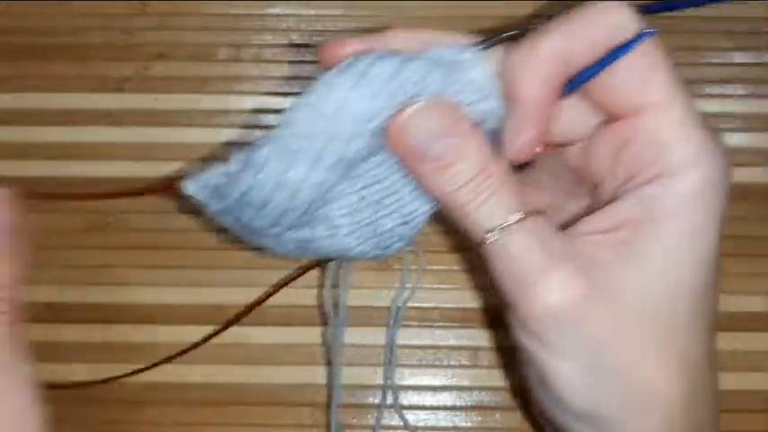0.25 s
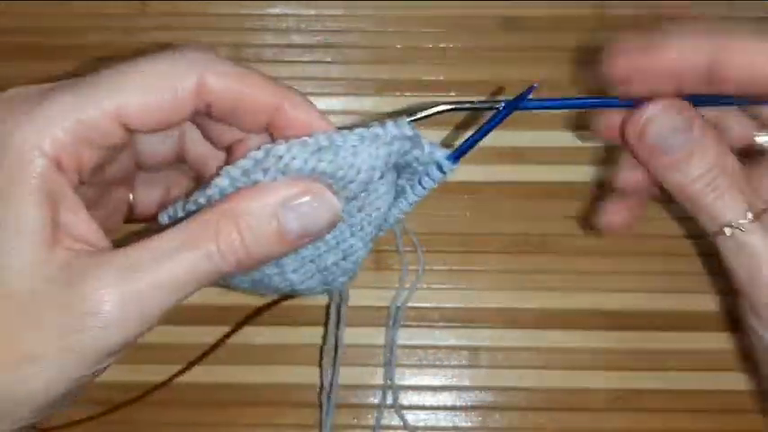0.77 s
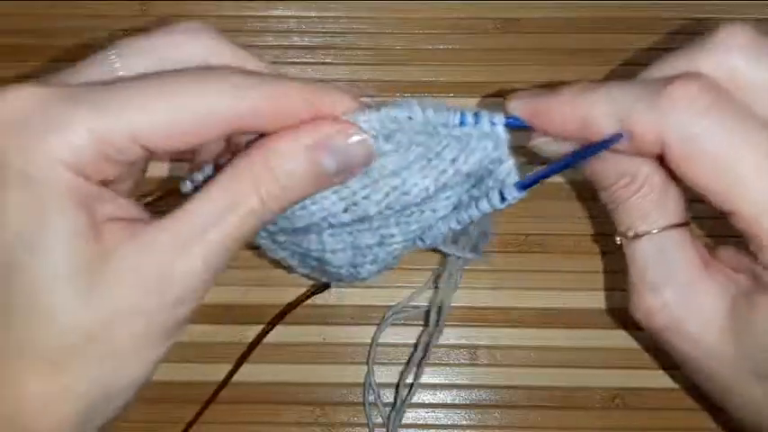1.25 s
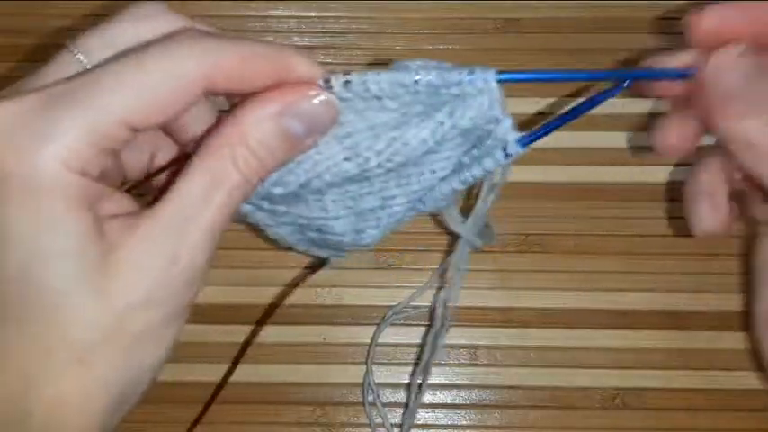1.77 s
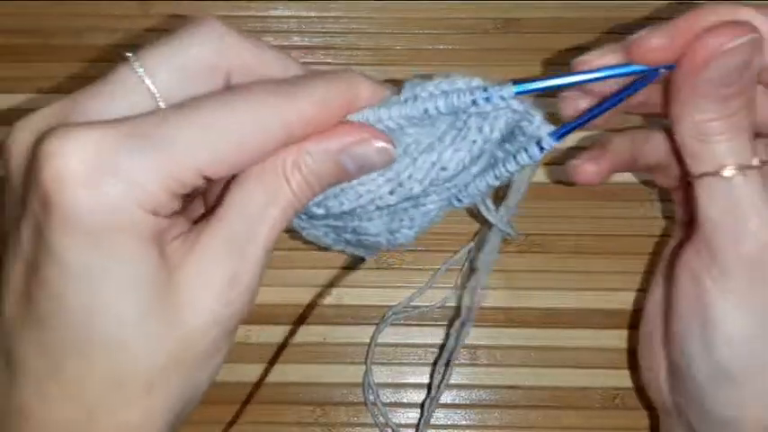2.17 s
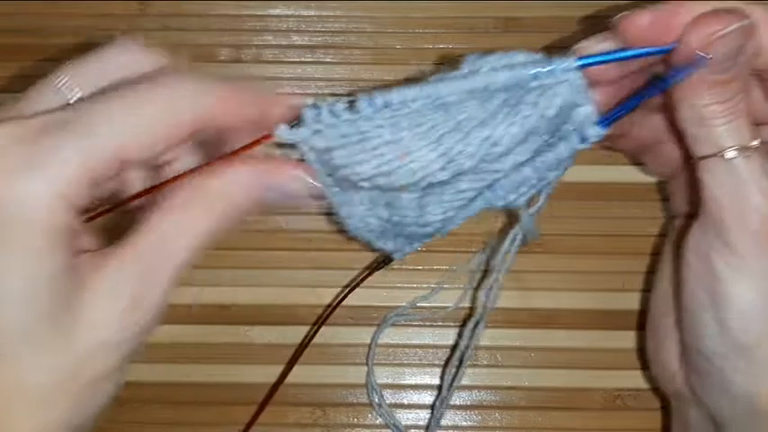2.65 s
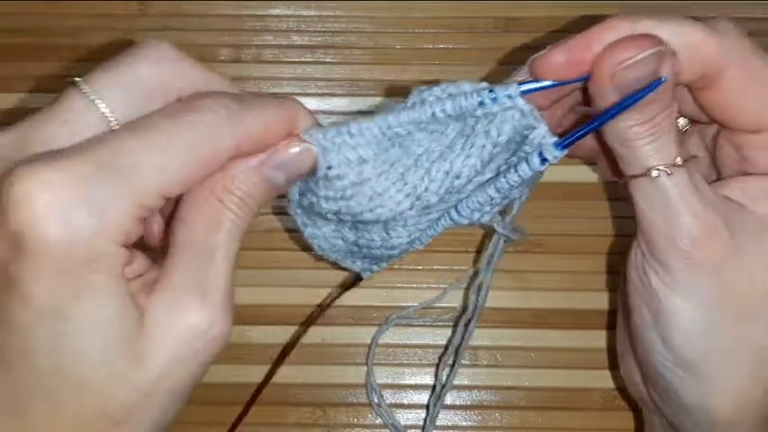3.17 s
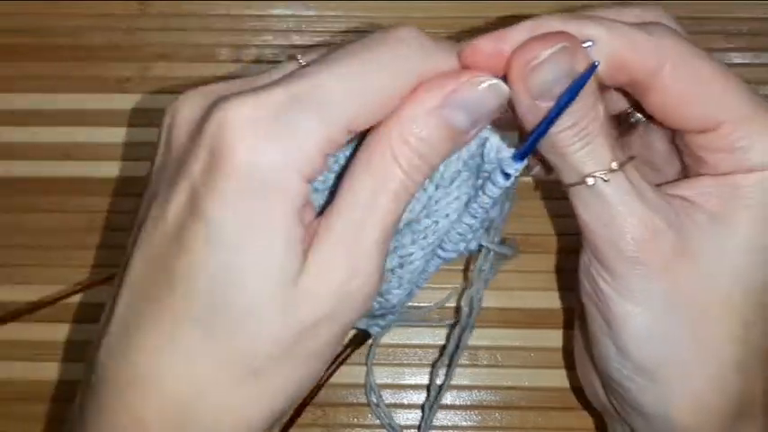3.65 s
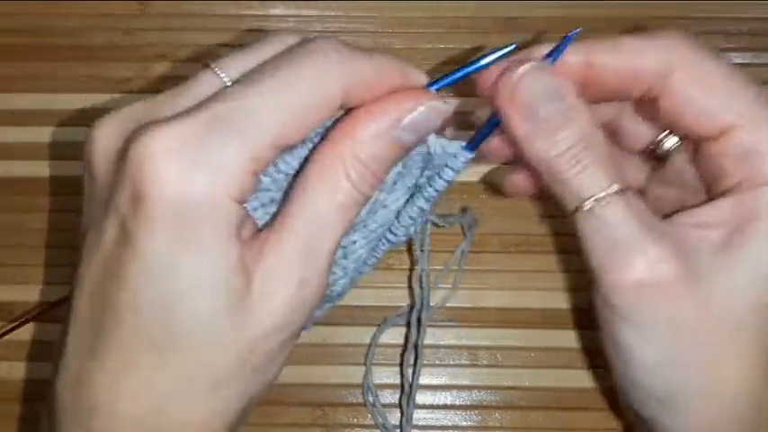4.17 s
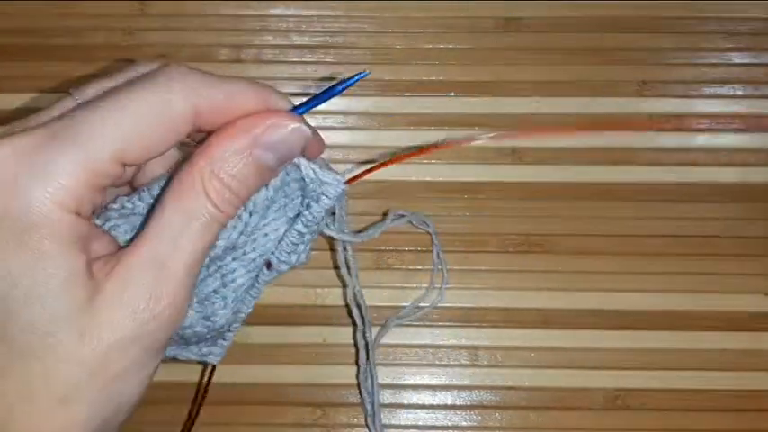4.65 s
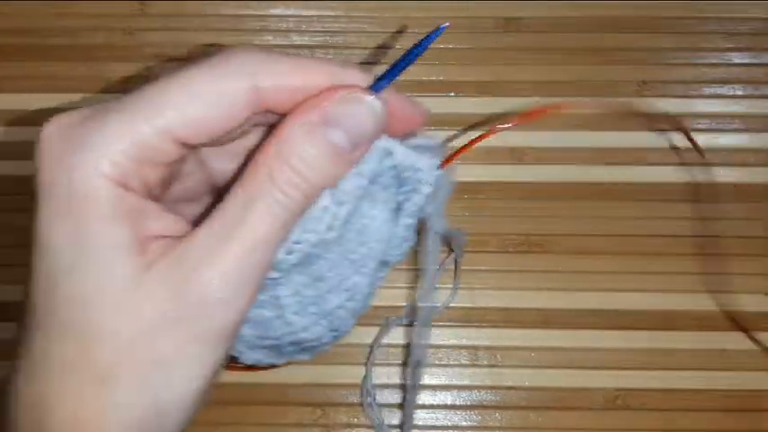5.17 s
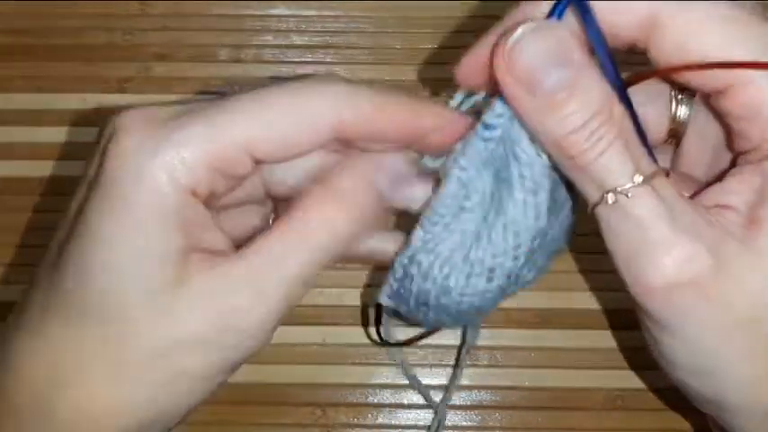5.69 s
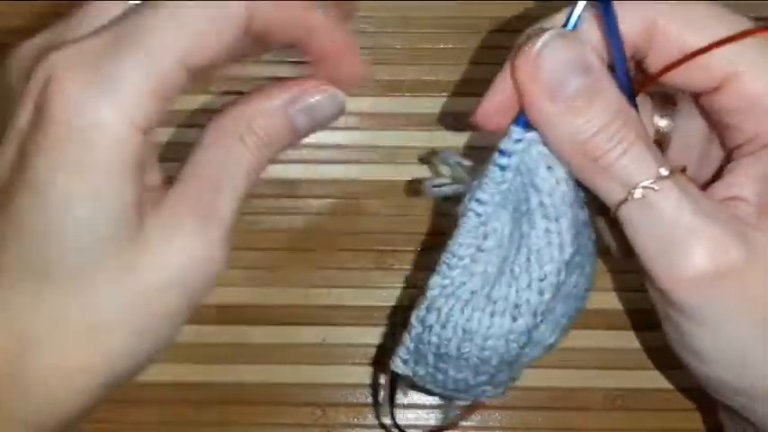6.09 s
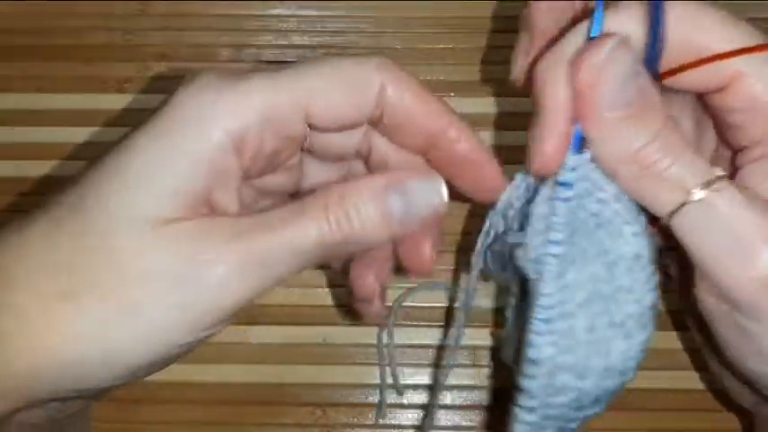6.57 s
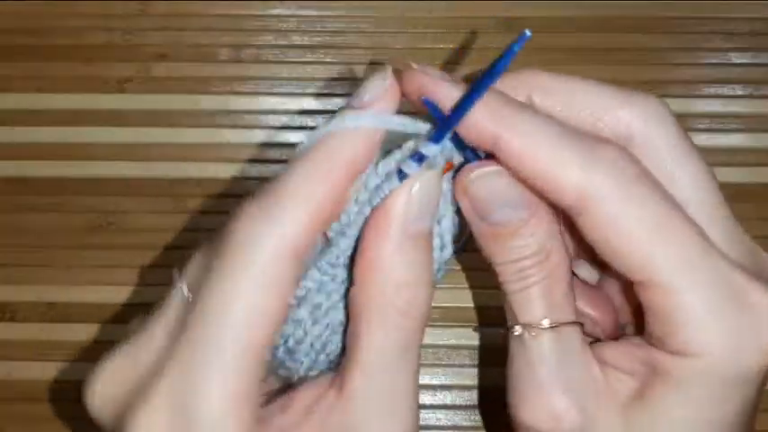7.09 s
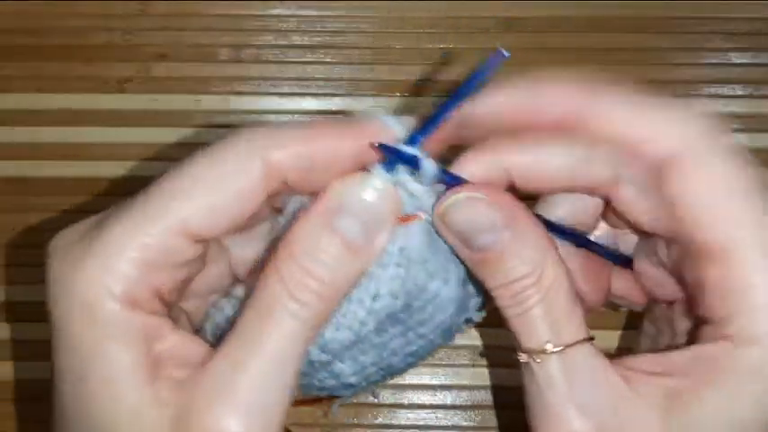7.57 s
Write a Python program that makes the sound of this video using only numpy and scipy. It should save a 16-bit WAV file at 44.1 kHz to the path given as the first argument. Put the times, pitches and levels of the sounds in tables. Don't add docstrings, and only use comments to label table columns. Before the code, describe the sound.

A small, hard-walled indoor space, very close stereo pickup, with a steady low hum and faint hiss. At 0.0 s a bright, sharp needle click, leaning left, then small metallic ticks and taps between 0.1 and 0.8 s, a cluster with a thin ring near 0.5. Soft wool rubs swell around 0.3, 0.9, 1.25 and 1.65, the stitches whistling faintly. A clear tick at 2.1 follows a short slide; a dull tap at 2.6. Brief rustles at 3.2-3.5, then airy yarn hiss from 4.1 to 4.7. At 5.13 a loud, abrupt cable slap on the slats, with clatter, a low thud and short ring. Near-quiet returns with faint slides. At 6.77-6.84 a rising clatter bursts into hard, fast raps that bounce away, echoing briefly. Tiny ticks at 7.2 and 7.6, and soft wool rubs near 7.5 and 7.7, finish it.

```python
import sys
import numpy as np
from scipy import signal
from scipy.fft import rfft, irfft
from scipy.io import wavfile
from scipy.ndimage import uniform_filter1d

SR = 44100
rng = np.random.default_rng(int(sys.argv[2]) if len(sys.argv) > 2 else 0)


def volts_from_db(level):
    exponent = np.asarray(level, float) / 20
    return 10 ** exponent


def transcribe(signal):
    frames = np.atleast_2d(signal).T
    limited = np.clip(frames, -1, 1)
    pcm = np.round(limited * 32767).astype(np.int16)
    wavfile.write(sys.argv[1], SR, pcm)


N = 345160

# frequency [Hz], density [dB per Hz].
FLOOR_COLOUR = [(15, -51.5), (25, -16.5), (102, -7), (134, 0.5), (166, -7.5), (229, -10.5), (309, -12.5),
                (384, -16), (476, -19), (2050, -24.5), (3250, -26), (8140, -28), (13600, -25),
                (16000, -105)]
# frequency [Hz], likeness [-1 to 1].
FLOOR_LIKENESS = [(60, -0.017), (150, 0.79), (380, 0.36), (950, -0.053), (2380, -0.021), (5980, 0.00048),
                  (15000, -0.015)]
# frequency [Hz], left over right [dB].
FLOOR_LEANING = [(60, 0), (180, -0.5), (550, -0.5), (1650, -1.0), (4970, -0.5), (15000, -1)]
FLOOR_DB = -57

# start [s], peak level [dB], centre frequency [Hz], left over right [dB], room feed [dB].
TIP_TICKS = [(0.0275, -5.5, 6140, 5, 0.5), (0.3022, -25, 6800, -1, 5), (0.307, -26, 6500, -4, -7),
             (0.4835, -22.5, 4700, -3, -4), (0.4867, -27.5, 7100, 7.5, 1), (0.4964, -32, 6770, 3, -1),
             (1.6124, -35, 8270, -8, 3), (1.6415, -33, 8250, -12, 2), (2.1208, -15.5, 7800, -1.5, 1),
             (5.6283, -38, 12500, -2, 4), (6.7747, -20, 4130, 4, 9), (7.209, -33, 7000, 0, 1),
             (7.5927, -38, 11500, 5, -3)]
# start [s], peak level [dB], centre frequency [Hz], left over right [dB], room feed [dB].
SHAFT_TAPS = [(0.075, -27, 5500, -0.5, 2), (0.0846, -31, 4170, -12, -1), (0.184, -37.5, 5200, -3, 8.5),
              (0.354, -39, 5100, 1, 5), (0.5162, -35, 4470, -3.5, 7), (0.5639, -28, 6300, 13, 8),
              (0.645, -30.5, 7600, 4, 6), (0.825, -40, 5700, 5, 9.5), (1.065, -40, 5840, 0, 7),
              (1.4196, -31, 5500, -6, 9), (2.5068, -40.5, 5560, 18, 10.5), (2.5882, -27.5, 5200, 1, 5.5),
              (3.4045, -34, 6540, -14, 3), (5.1287, -6.5, 5060, -9, 7.5), (6.335, -46, 6310, 6, -1),
              (7.225, -40, 6810, 7, -7.5)]
# start [s], peak level [dB], centre frequency [Hz], left over right [dB], room feed [dB].
CABLE_RAPS = [
    (0.3035, -34, 2700, 7, 6),
    (0.4838, -42, 1700, -8, -3),
    (2.133, -37.5, 3030, 11, 13),
    (2.3284, -42, 2680, 6, 4.5),
    (3.405, -37, 2400, -5, 9),
    (6.792, -7.5, 5000, -5.5, 1.5),
    (6.8005, -9, 4200, 3, -5),
    (6.8068, -12, 4380, 3, -13),
    (6.8125, -16, 5500, -13, -8),
    (6.835, -18, 4300, -16, -12),
]
# broad crack [dB], top needle mode [dB].
TIP_COLOUR = (9.1, -15.5)
SHAFT_COLOUR = (8, -19)
RAP_COLOUR = (-6, -25)
RATTLE_SHARE = 0.21
# start [s], peak level [dB], frequency [Hz], 60 dB decay time [s].
PINGS = [
    (0.483, -25.5, 11700, .015),
    (.488, -28, 11800, 0.031),
    (0.486, -34, 11370, .04),
    (.488, -33, 14400, .02),
    (5.13, -36, 5213, .3),
    (5.13, -37, 3410, .15),
    (5.132, -36, 5650, .1),
    (6.801, -30.5, 3800, 0.12),
    (6.8, -26, 4170, 0.085),
]

# start [s], peak level [dB], centre frequency [Hz], length [s], room feed [dB].
THUDS = [
    (0.286, -48.5, 97, 0.015, 4),
    (.483, -43.5, 660, 0.0011, 0),
    (1.567, -50, 800, 0.003, 0),
    (2.12, -51.5, 605, 0.0031, 3.5),
    (3.441, -50, 705, 0.0015, 0.5),
    (3.738, -50, 650, 0.009, -3),
    (5.127, -32, 372, 0.024, -6.5),
    (6.333, -54, 900, 0.0023, -10),
    (6.811, -50, 710, 0.039, 7.5),
]

# strongest moment [s], swell [s], fade [s], level [dB], mode frequency [Hz].
STITCH_SLIDES = [(1.27, .13, 0.084, -56.5, 4620), (1.24, 0.13, .1, -66, 8150),
                 (1.642, .06, 0.046, -57, 7900), (2.03, 0.12, 0.15, -60, 4900),
                 (2.09, 0.064, 0.046, -56, 4950), (3.43, 0.033, .06, -60.5, 2200),
                 (2.0, 0.084, .13, -64, 7900), (4.55, .15, 0.38, -64, 7600), (5.52, .15, 0.1, -66.5, 6000),
                 (5.85, .04, .04, -61, 6360), (5.845, .04, .04, -65, 5100), (6.9, .04, .08, -66, 6000),
                 (7.032, 0.056, .05, -65, 5900)]
# strongest moment [s], swell [s], fade [s], level [dB], mode frequency [Hz].
WOOL_RUBS = [(.33, 0.04, 0.071, -51.5, 4850), (.465, 0.1, .012, -58, 4850), (.91, 0.076, 0.13, -61.5, 5400),
             (1.04, 0.068, 0.071, -66, 5400), (1.645, 0.086, .12, -54, 5030),
             (3.224, .035, 0.072, -55.5, 5630), (3.412, 0.0077, 0.088, -57, 4000),
             (3.46, .06, 0.071, -55.5, 5500), (2.1, .2, 0.033, -55.5, 5470),
             (1.25, 0.15, 0.11, -53.5, 5500), (3.75, 0.096, 0.36, -65.5, 5430),
             (4.22, .14, 0.13, -55, 6500), (4.25, 0.14, .12, -58, 12200), (4.36, .12, .1, -57, 13500),
             (4.444, 0.12, 0.081, -55, 5630), (4.6, 0.064, .08, -58, 14000), (4.68, 0.15, 0.18, -63, 12000),
             (7.48, .13, 0.074, -58.5, 5630), (7.735, .1, 0.055, -53, 5600)]
# first mode width [Hz], middle mode [dB], top mode [dB], hiss [dB], flatness of the peak [exponent].
STITCH_COLOUR = (850, -10, -5, -3.5, 3.2)
RUB_COLOUR = (4200, -16, -4, -14, 1.5)
# frequency [Hz], width [Hz].
UPPER_MODES = [(8150, 1500), (12000, 5000)]
STROKE_DEPTH_DB = 17
STUTTER_DB, STUTTER_S = 2, 0.0073

# start [s], rise [s], hold [s], level [dB], fade [dB per s].
FALLS = [
    (5.1283, .001, 0.011, -23.5, 700),
    (6.771, .021, 0.028, -29.5, 750),
]
# frequency [Hz], density [dB per Hz].
FIRST_FALL = [(88, -50), (150, -26), (352, -15), (1090, -14), (2020, -15.5), (3350, -6), (4140, -9.5),
              (5540, -1.5), (9360, -9), (11400, -3.5), (15500, -35)]
SECOND_FALL = [(180, -58.5), (300, -18), (794, -23), (1180, -27), (1670, -10), (2980, -6.5), (4070, -4),
               (5050, -8), (6360, -8), (9290, -11), (15500, -17)]
FALL_RISE_DB = 15

# frequency [Hz], 60 dB decay time [s].
ROOM_T60 = [(300, 0.13), (900, 0.31), (2000, 0.26), (5500, .28), (14000, 0.28)]
FIRST_ECHO_S, BUILD_UP_S, ECHO_LUMPS_DB = 0.0031, 0.002, -3.5

# frequency [Hz], width [Hz], gain [dB].
LEFT_PORT = [(5800, 6200, 6), (8620, 6000, -27), (12150, 2500, -3), (17100, 4700, -4)]
RIGHT_PORT = [(3800, 530, 4), (8200, 650, 4.5), (12400, 2000, 1.5), (17400, 1300, -15)]

# lower edge [Hz], upper edge [Hz], threshold [dB].
TOP_BANDS = [(14350, 15150, -67), (15150, 15800, -56)]
CUTOFF_HZ, ATTACK_DB, ATTACK_OVER_DB = 16800, -66, 7


def rms_one(x):
    return x / np.sqrt(np.mean(x ** 2) + 1e-20)


def at_hz(points, hz):
    table_hz, values = np.array(points).T
    return np.interp(np.log(hz), np.log(table_hz), values)


def resonance(x, hz, width_hz):
    r = np.exp(-np.pi * width_hz / SR)
    top = (1 - r * r) / 2 * np.array([1, 0, -1])
    return signal.lfilter(top, [1, -2 * r * np.cos(2 * np.pi * hz / SR), r * r], x)


def add(track, s, sound):
    i = round(s * SR)
    track[..., i:i + sound.shape[-1]] += sound[..., :N - i]


def grains(per_s, spread_db, size):
    excess = np.minimum(rng.exponential(1, (2, size)), 4)
    heights = volts_from_db(spread_db * excess) * rng.choice([-1, 1], (2, size))
    return heights * (rng.random((2, size)) < per_s / SR)


def quiet():
    hz = np.maximum(np.fft.rfftfreq(N, 1 / SR), 1)
    mid, side = rfft(rng.standard_normal((2, N)))
    alike = np.clip(at_hz(FLOOR_LIKENESS, hz), -.95, .95)
    sign = np.array([[1], [-1]])
    pair = np.sqrt(1 + alike) * mid + sign * np.sqrt(1 - alike) * side
    leaning_db = sign * at_hz(FLOOR_LEANING, hz) / 2
    colour = volts_from_db(at_hz(FLOOR_COLOUR, np.minimum(hz, 13000)) + leaning_db)
    return volts_from_db(FLOOR_DB + 2.5) * rms_one(irfft(pair * colour, N))


def burst(decay_s):
    t = np.arange(900) / SR
    envelope = np.exp(-np.abs(t - .0008) / np.where(t < .0008, .0003, decay_s))
    hit = RATTLE_SHARE * rng.standard_normal((2, 900)) * envelope
    hit[[0, 1], [34, 40]] += 1
    return hit


def contact(peak_db, hz, crack_db, top_db):
    hit = np.vstack([burst(0.0014), signal.unit_impulse(900, 34)])
    body = resonance(resonance(hit, hz, 1900), hz, 6200)
    crack = resonance(resonance(hit, hz, 6800), 5600, 12900)
    body = body + volts_from_db(crack_db) * crack
    top = resonance(hit, 11700, 4400)
    body = body / np.abs(body[:2]).max()
    top = top / np.abs(top[:2]).max()
    return volts_from_db(peak_db) * (body + volts_from_db(top_db + 17) * top)


def ticks():
    direct, feed = np.zeros((2, N)), np.zeros(N)
    kinds = ((TIP_TICKS, TIP_COLOUR), (SHAFT_TAPS, SHAFT_COLOUR), (CABLE_RAPS, RAP_COLOUR))
    for rows, (crack_db, top_db) in kinds:
        for s, peak_db, hz, pan_db, room_db in rows:
            sound = contact(peak_db, hz, crack_db, top_db)
            add(direct, s, sound[:2] * volts_from_db(pan_db / 2 * np.array([[1], [-1]])))
            add(feed, s, volts_from_db(room_db) * sound[2])
    t = np.arange(12000) / SR
    for s, peak_db, hz, t60 in PINGS:
        ring = volts_from_db(peak_db - 60 * t / t60) * np.sin(2 * np.pi * hz * t)
        add(direct, s, ring * volts_from_db(np.array([[-3], [3]])))
        add(feed, s, volts_from_db(-10.5) * ring)
    return direct, feed


def thuds():
    direct, feed = np.zeros((2, N)), np.zeros(N)
    t = np.arange(6000) / SR
    for s, peak_db, hz, length_s, room_db in THUDS:
        push = rng.standard_normal(6000) * np.minimum(t / 0.0065, 1) * np.exp(-t / length_s)
        knock = resonance(resonance(push, hz, 1.07 * hz), hz, 1.75 * hz)
        knock = volts_from_db(peak_db) * knock / np.abs(knock).max()
        add(direct, s, knock[None])
        add(feed, s, volts_from_db(room_db) * knock)
    return direct, feed


def stroke(t, swell_s, fade_s, level_db, flatness):
    away = np.where(t < 0, -t / swell_s, t / fade_s) ** flatness
    stutter = np.interp(t - t[0], STUTTER_S * np.arange(200), rng.standard_normal(200))
    return volts_from_db(level_db - STROKE_DEPTH_DB * away + STUTTER_DB * stutter)


def slides():
    out = np.zeros((2, N))
    for rows, colour in ((STITCH_SLIDES, STITCH_COLOUR), (WOOL_RUBS, RUB_COLOUR)):
        width_hz, middle_db, top_db, hiss_db, flatness = colour
        for s, swell_s, fade_s, level_db, mode_hz in rows:
            slips = grains(9000, 4.8, size=SR // 2 + SR // 4)
            t = np.arange(slips.shape[1]) / SR - 1.5 * swell_s
            envelope = stroke(t, swell_s, fade_s, level_db, flatness)
            wool_hiss = resonance(resonance(slips[:, ::-1], 6600, 3100), 6200, 6000)
            sound = volts_from_db(hiss_db) * rms_one(wool_hiss)
            modes = [(mode_hz, width_hz)] + UPPER_MODES
            for (hz, wide_hz), mode_db in zip(modes, (0, middle_db, top_db)):
                slips = np.roll(slips, 999, axis=1)
                whistle = resonance(resonance(slips, hz, wide_hz), hz, 2 * wide_hz)
                sound = sound + volts_from_db(mode_db + 0.5) * rms_one(whistle)
            add(out, s - 1.5 * swell_s, envelope * sound)
    return out


def falls():
    out = np.zeros((2, N))
    hz = np.maximum(np.fft.rfftfreq(8192, 1 / SR), 1)
    t = np.arange(8192) / SR
    for (s, rise_s, hold_s, level_db, fade_db_per_s), colour in zip(FALLS, (FIRST_FALL, SECOND_FALL)):
        hits = grains(6000, 2.6, size=8192)
        hits[1] += 0.35 * np.roll(hits[0], 5)
        clatter = rms_one(irfft(rfft(hits) * volts_from_db(at_hz(colour, hz))))
        rise_db = FALL_RISE_DB * np.maximum(1 - t / rise_s, 0)
        fade_db = fade_db_per_s * np.maximum(t - rise_s - hold_s, 0)
        add(out, s, clatter * volts_from_db(level_db - rise_db - fade_db))
    return out


def room(feed):
    t = np.arange(SR // 2) / SR
    late = np.maximum(t - FIRST_ECHO_S, 0)
    lumps = np.repeat(rng.standard_normal((2, len(t) // 30)), 30, axis=1)
    lumps = lumps * np.exp(-t / 0.019)
    white = rfft(rng.standard_normal((2, len(t))))
    octave = np.log2(np.maximum(np.fft.rfftfreq(len(t), 1 / SR), 1) / 125)
    tail = 0
    for k in range(8):
        band = irfft(white * np.maximum(1 - np.abs(octave - k), 0), len(t))
        tail = tail + band * volts_from_db(-60 * t / at_hz(ROOM_T60, 125 * 2 ** k))
    tail = tail * volts_from_db(ECHO_LUMPS_DB * lumps) * (1 - np.exp(-late / BUILD_UP_S))
    tail = tail / np.sqrt(np.sum(tail ** 2) / 2)
    return signal.fftconvolve(feed[None], tail, axes=1)[:, :N]


def ports(x):
    out = []
    for side, modes in zip(x, (LEFT_PORT, RIGHT_PORT)):
        for hz, width_hz, gain_db in modes:
            side = side + (volts_from_db(gain_db) - 1) * resonance(side, hz, width_hz)
        out.append(side)
    return np.array(out)


def scene():
    tick, tick_feed = ticks()
    thud, thud_feed = thuds()
    cable, yarn = falls(), slides()
    echoes = room(tick_feed + thud_feed + volts_from_db(-1.5) * cable[0] + volts_from_db(-15) * yarn[0])
    return ports(tick + thud + cable + yarn + echoes) + quiet()


def low_pass(x):
    return signal.sosfilt(signal.butter(12, 16990, fs=SR, output="sos"), x)


def record(dry):
    hz, spectrum = np.fft.rfftfreq(N, 1 / SR), rfft(dry)
    out = irfft(spectrum * (hz < TOP_BANDS[0][0]), N)
    for low_hz, high_hz, threshold_db in TOP_BANDS:
        band = irfft(spectrum * (hz >= low_hz) * (hz < high_hz), N)
        power = uniform_filter1d(np.mean(band ** 2, axis=0), size=1024)
        loud_enough = 1. * (power > volts_from_db(2 * threshold_db))
        out += band * uniform_filter1d(loud_enough, size=512)
    band = irfft(spectrum * (hz >= TOP_BANDS[-1][1]) * (hz < CUTOFF_HZ), N)
    now = uniform_filter1d(np.mean(band ** 2, axis=0), size=256)
    before = uniform_filter1d(now, size=1024, origin=511)
    attack = (now > volts_from_db(2 * ATTACK_DB)) * (now > volts_from_db(2 * ATTACK_OVER_DB) * before)
    out += band * uniform_filter1d(1. * attack, size=128)
    return low_pass(out)


dry = scene()
out = record(dry)
transcribe(out)
```